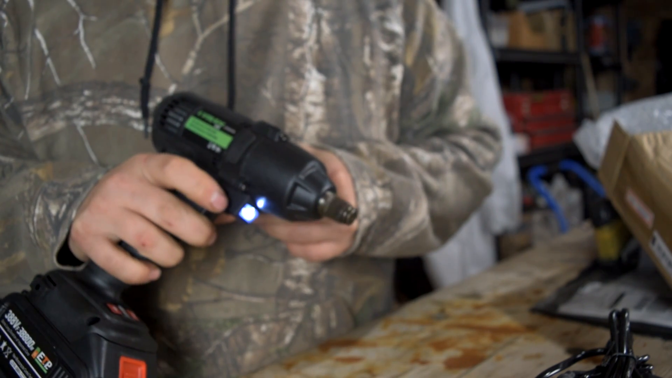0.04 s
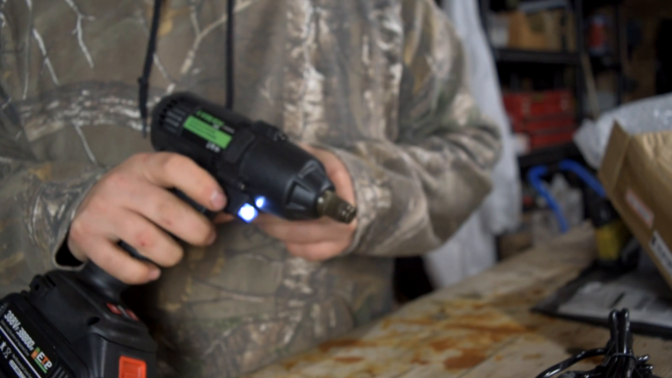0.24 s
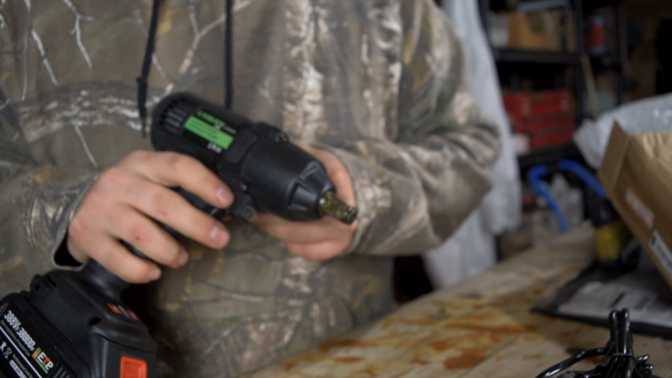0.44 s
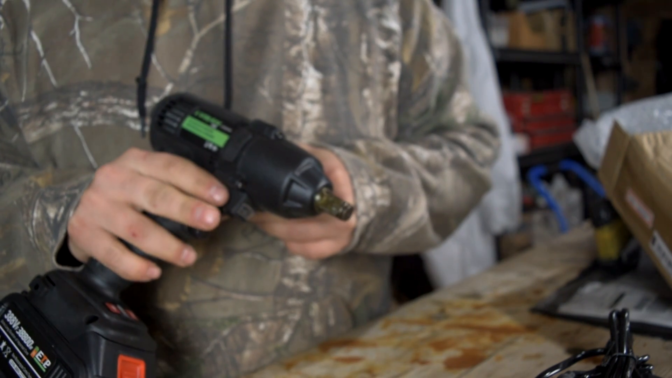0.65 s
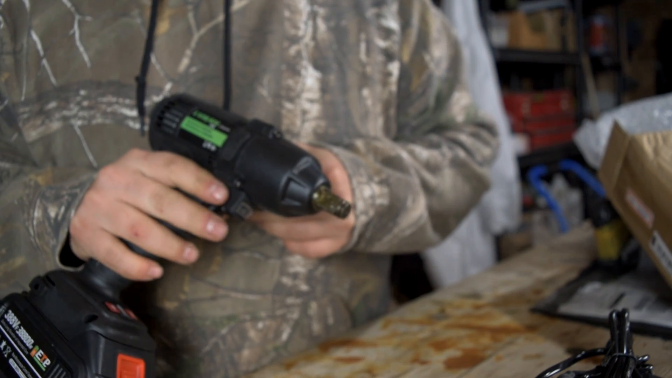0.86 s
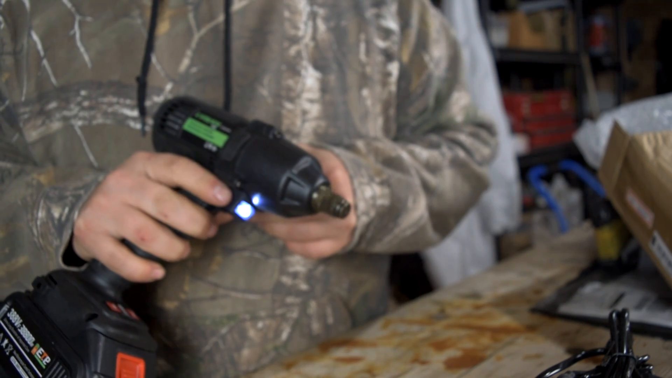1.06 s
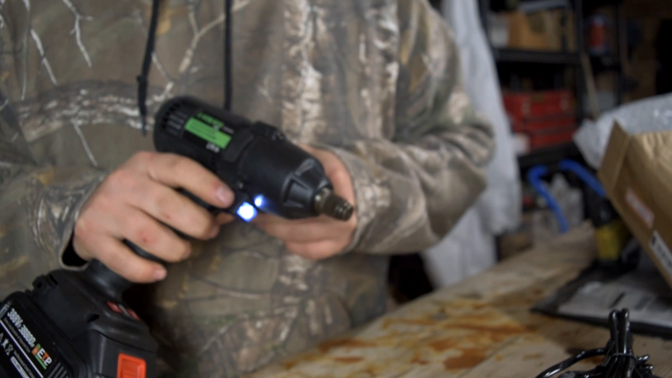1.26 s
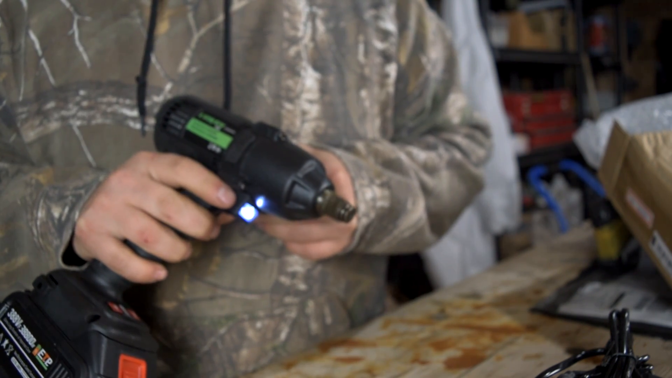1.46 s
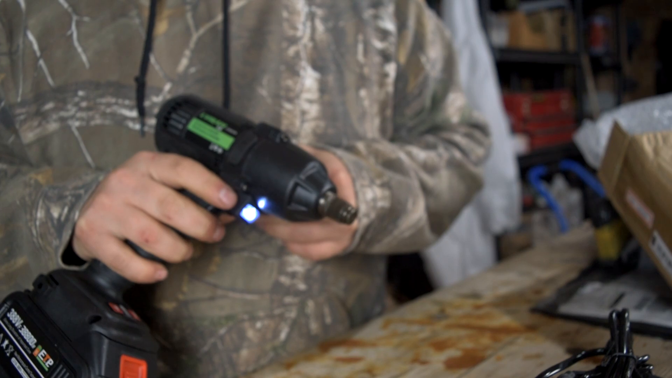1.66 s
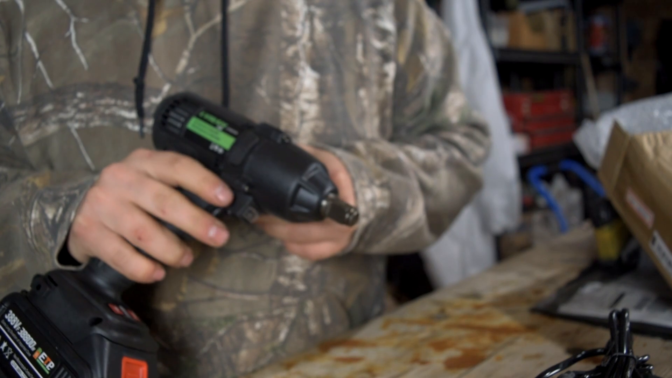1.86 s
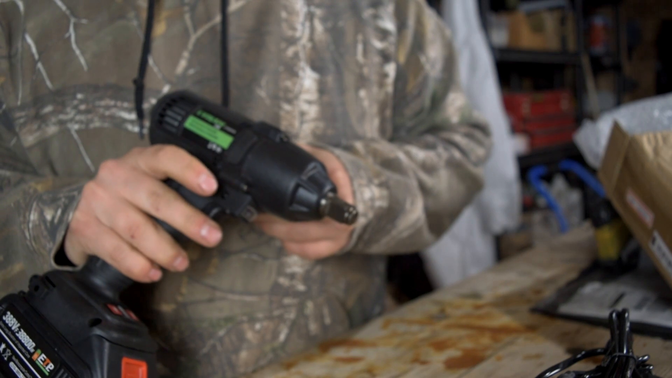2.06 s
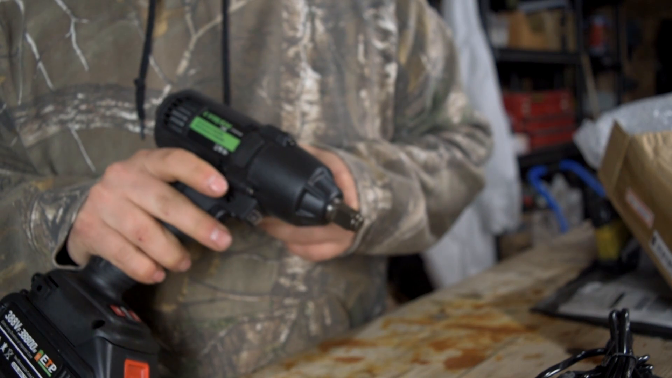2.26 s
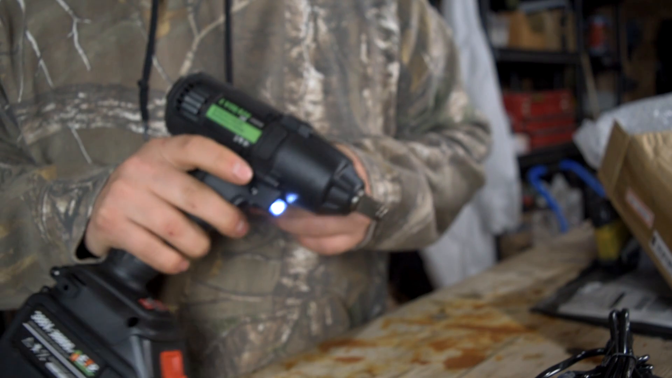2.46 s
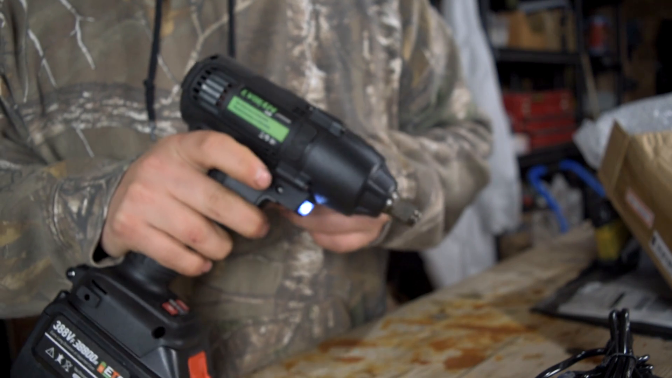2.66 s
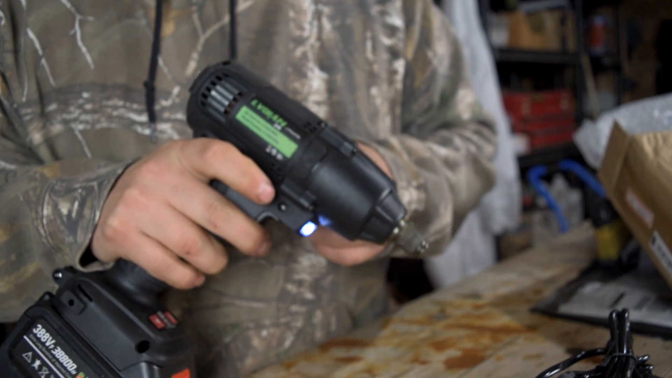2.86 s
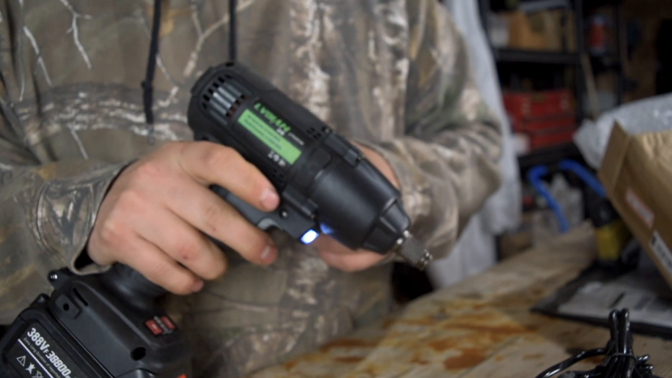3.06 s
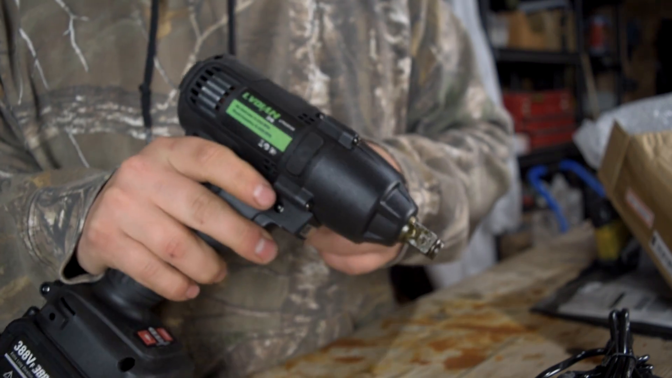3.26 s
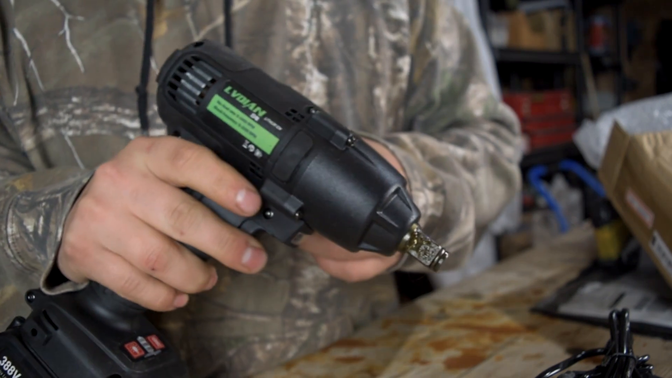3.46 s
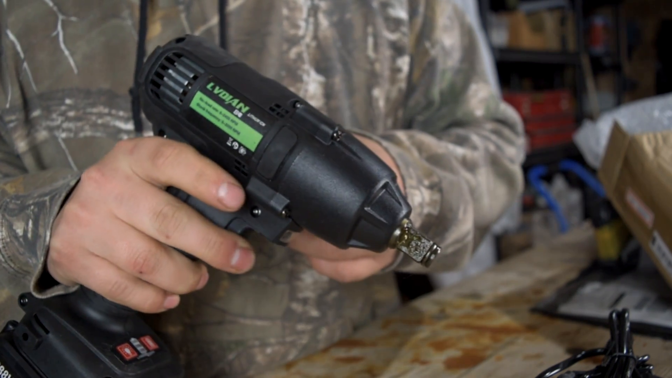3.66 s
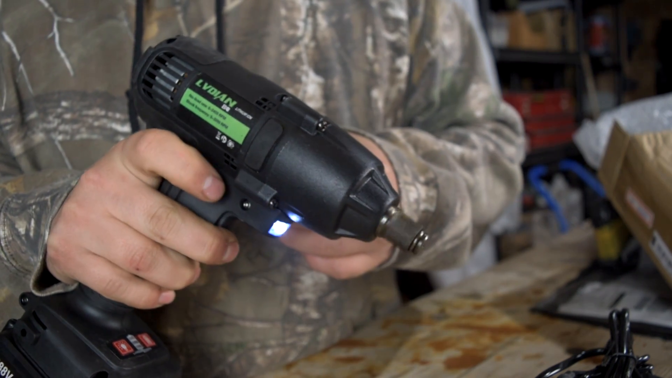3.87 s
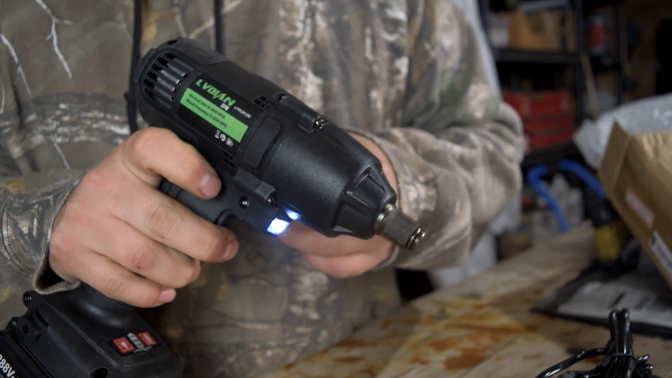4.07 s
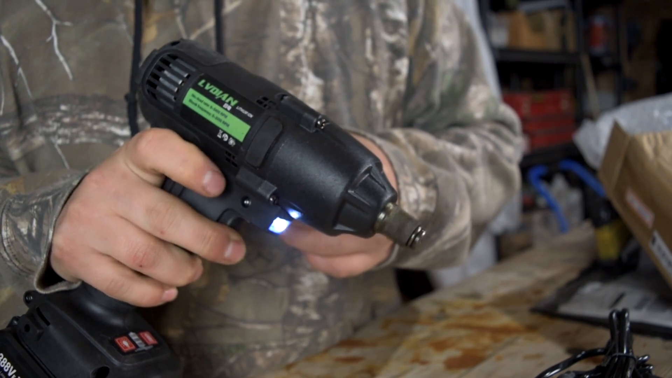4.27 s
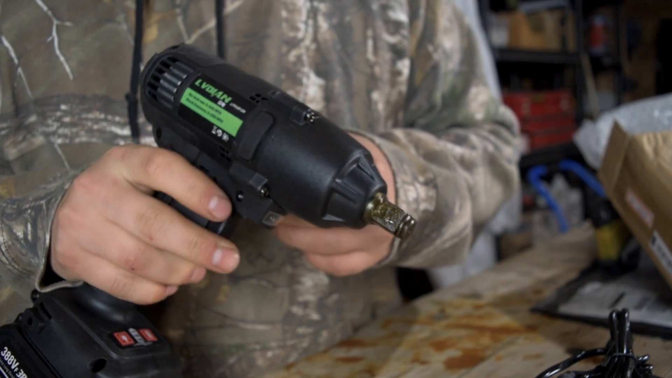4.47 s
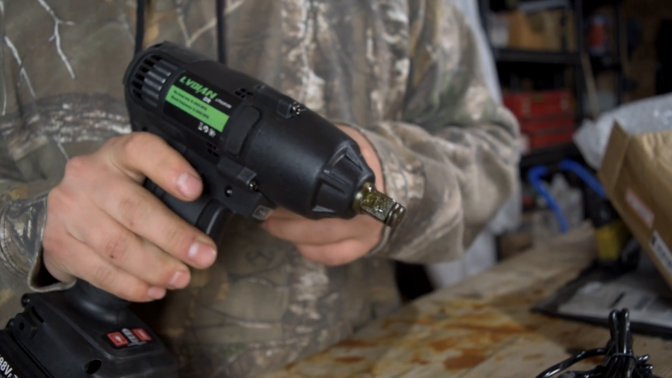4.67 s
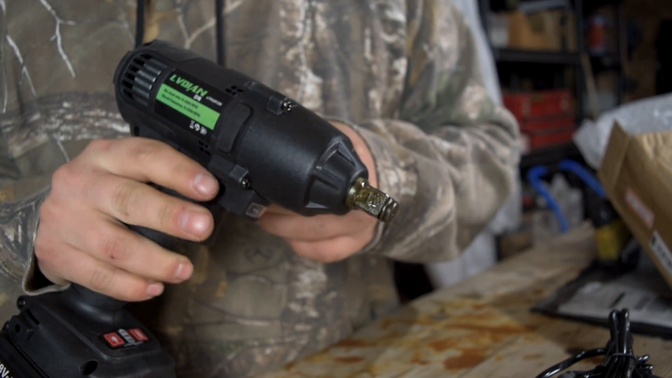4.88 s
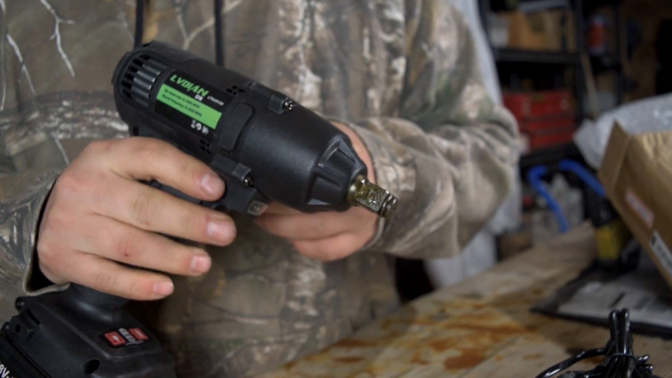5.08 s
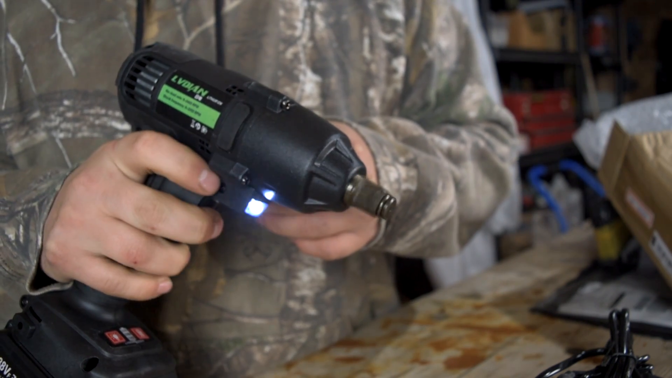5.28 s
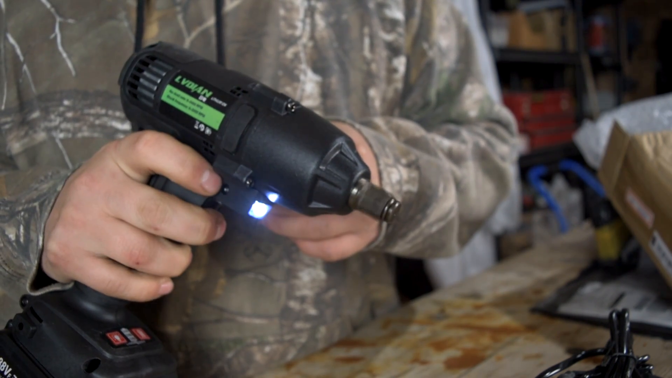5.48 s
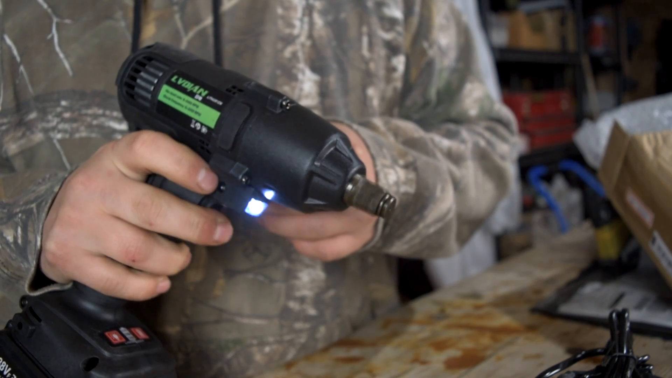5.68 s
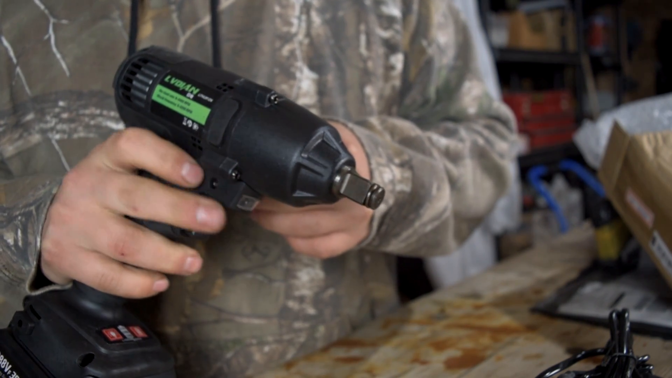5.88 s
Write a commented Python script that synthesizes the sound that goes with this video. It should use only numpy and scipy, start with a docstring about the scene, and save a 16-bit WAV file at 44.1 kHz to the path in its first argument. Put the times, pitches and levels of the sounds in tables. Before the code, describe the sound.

Close up, a handheld power driver revs freely again and again, gears whirring harshly, stopping quickly between loud plastic clicks and low handling bumps.

```python
"""Whining, rattling gears are heard first: a cordless impact driver, already running, coasts and is braked.
Four more pulls without load follow, close by in a small workshop: gear and motor tones over tooth noise.
The speed control sings as the motor starts; clicks of trigger, switch and drive ring the plastic shell.
Handling shakes the microphone mount, soft air and short reflections lie behind; a fast limiter ducks
after overloads."""
import sys
import numpy as np
from scipy import signal
from scipy.fft import irfft
from scipy.io import wavfile
from scipy.ndimage import uniform_filter1d

SR = 44100
rng = np.random.default_rng(int(sys.argv[2]) if len(sys.argv) > 2 else 0)


def to_wav(sig):
    """Store sig (one row per channel, or 1-D mono) as 16-bit WAV at the path in sys.argv[1].

    Samples outside -1..1 are clipped; the rate is SR.
    """
    pcm = np.clip(np.atleast_2d(sig), -1, 1) * 32767
    pcm = np.round(pcm).astype(np.int16)
    wavfile.write(sys.argv[1], SR, pcm.T)  # frames by channels


N = 261513
TIME = np.arange(N) / SR  # s
RUNNING_HZ = 1400  # reference gear mesh rate


def from_db(db):
    """Decibels to gain."""
    return 10 ** (np.asarray(db) / 20)


def rms_one(x):
    """Scale to unit power."""
    return x / np.sqrt(np.mean(x ** 2) + 1e-20)


def gain_curve_db(rows):
    """Interpolate rows of (s, dB) to every sample."""
    s, db = np.transpose(rows)
    return np.interp(TIME, s, db)


def filtered(x, order, hz, kind="low"):
    """Butterworth filter."""
    return signal.sosfilt(signal.butter(order, hz, kind, fs=SR, output="sos"), x)


def coloured(x, spectrum):
    """Give a signal a smooth spectrum, rolled off below its first frequency; rms 1."""
    hz, db = np.transpose(spectrum)
    bins_hz = np.maximum(np.fft.rfftfreq(2 * N, 1 / SR), 1)
    gain = from_db(np.interp(np.log(bins_hz), np.log(hz), db))
    gain = gain * np.minimum(bins_hz / hz[0], 1) ** 2
    pulse = np.roll(irfft(gain), 1024)[:2048] * np.hanning(2048)
    return rms_one(signal.fftconvolve(x, pulse, "same"))


def drift(hz):
    """Smooth random curve of spread 1 that changes about hz times a second."""
    step = 20  # samples between random draws
    r = np.exp(-2 * np.pi * hz * step / SR)
    draws = rng.standard_normal(N // step + 2002)
    slow = signal.lfilter([1], [1, -2 * r, r * r], draws)[2000:]  # settled part only
    return np.interp(np.arange(N) / step, np.arange(len(slow)), rms_one(slow))


def angle(hz):
    """Angle in radians turned at a given rate."""
    return 2 * np.pi * np.cumsum(hz) / SR


def ring(x, hz, t60_s):
    """Two-pole resonator: a unit click sets a decaying sine of initial height 1 ringing."""
    r, w = from_db(-60 / (t60_s * SR)), 2 * np.pi * hz / SR
    return signal.lfilter([0, np.sin(w)], [1, -2 * r * np.cos(w), r * r], x + 1e-18)


def tones(turn, table, flutter_db, slip_rad, flutter_hz):
    """Multiples of a turning part, each drifting in level and phase."""
    total = 0
    for multiple, db in table:
        level = from_db(db + flutter_db * drift(flutter_hz))
        phase = slip_rad * drift(flutter_hz) + 2 * np.pi * rng.random()
        total = total + level * np.sin(round(multiple) * turn + phase)
    return np.sqrt(2) * total


def each_turn(turn, count):
    """Small flaws of a turning part give the same uneven force on every turn."""
    force = irfft(np.r_[0, np.exp(2j * np.pi * rng.random(count))], 4096)
    one_turn = np.linspace(0, 2 * np.pi, len(force), endpoint=False)
    return rms_one(np.interp(turn, one_turn, force, period=2 * np.pi))


# Trigger pulls. Each row: start in s, full power in s, release in s, brake in s, surge time constant in s,
# top gear mesh rate in Hz, last creep to the top in Hz, rattle in dB, mesh tone in dB,
# take-up clunk in dB, hum in dB (rattle, tone and hum before speed and torque act).
PULLS = [(-.2, -.151, .356, .412, .034, 1449, 90, -15.5, -15.5, -40, -17.5),
         (1.029, 1.052, 1.734, 1.818, .024, 1456, 125, -16.8, -19, -18, -16),
         (2.47, 2.573, 2.897, 3.16, .03, 1444, 100, -16, -15.3, -32, -18),
         (3.715, 3.868, 4.276, 4.324, .034, 1501, 195, -16.2, -13.7, -21, -12),
         (5.212, 5.244, 5.704, 5.76, .031, 1509, 72, -16, -18, -20, -13.5)]
HANDOVER_HZ = 650  # mesh rate at the end of the soft start
CREEP_S, COAST_S = .3, .215  # time constants
BRAKE_S, FRICTION_HZ_PER_S = .035, 260
RATTLE_POWER, WHINE_POWER, HUM_POWER = 1.0, 4.5, 3  # exponents of speed
STRAIN_DB, COAST_TONE_DB = 15, -30
RUMBLE_DB, SLACK_DB, SLACK_HZ = -30.5, 5.5, 500  # slack gears rumble more, fully so SLACK_HZ below running
CLUNK_S, CLUNK_RUMBLE_DB, KICK_DB = 0.0057, -2, -24  # CLUNK_S: half-width at 1/e


def motor():
    """Mesh rate in Hz and gains of rattle, rumble, mesh tone and hum, set by speed, torque and brake."""
    mesh_hz = rattle = rumble = whine = drone = 0
    for (start, full, release, brake, surge_s, top_hz, creep_hz,
         rattle_db, whine_db, clunk_db, hum_db) in PULLS:
        # soft start, surge, creep to the top
        ramp = np.clip((TIME - start) / (full - start), 0, 1)
        driven_s = np.clip(TIME, full, release) - full
        surge_hz = (top_hz - creep_hz - HANDOVER_HZ) * np.exp(-driven_s / surge_s)
        powered_hz = ramp * (top_hz - surge_hz - creep_hz * np.exp(-driven_s / CREEP_S))
        # coast, then brake
        coasted_s = (TIME - release).clip(0)
        unbraked = np.clip(1 - (TIME - brake) / BRAKE_S, 0, 1)
        hz = (powered_hz * np.exp(-coasted_s / COAST_S) - FRICTION_HZ_PER_S * coasted_s).clip(0) * unbraked
        hz = uniform_filter1d(hz, size=500).clip(0)  # inertia rounds the corners

        speed = hz / RUNNING_HZ
        rolling = unbraked * np.minimum(hz / 420, 1) ** 2
        load_db = STRAIN_DB * (1 - powered_hz / top_hz) * ramp  # torque strains the teeth
        slack = np.clip((RUNNING_HZ - hz) / SLACK_HZ, 0, 1)
        # play taken up at full power; kick as the brake bites
        clunk = from_db(clunk_db) * np.exp(-((TIME - full) / CLUNK_S) ** 2)
        kick = from_db(KICK_DB) * np.exp(-((TIME - brake) / CLUNK_S) ** 2) * np.sqrt(speed)
        # coasting gears sing on their slack flanks
        coast_tone = from_db(COAST_TONE_DB) * slack * rolling * np.sqrt(speed) * (TIME > release)

        mesh_hz = mesh_hz + hz
        rattle = rattle + from_db(rattle_db + load_db) * unbraked * speed ** RATTLE_POWER
        rattle = rattle + clunk + .5 * kick
        rumble = rumble + from_db(RUMBLE_DB + SLACK_DB * slack + .5 * load_db) * rolling
        rumble = rumble + from_db(CLUNK_RUMBLE_DB) * clunk + kick
        whine = whine + from_db(whine_db) * speed ** WHINE_POWER + coast_tone
        drone = drone + from_db(hum_db) * speed ** HUM_POWER
    return mesh_hz, rattle, rumble, whine, drone


# Gear tones at and beside the tooth rate. Each row: multiple of the gear's turning rate, level in dB.
MESH_TONES = [(16, -9.5), (17, -4.5)]
# Gear tones around its overtones. Each row: multiple of the gear's turning rate, relative level in dB.
MESH_OVERTONES = [(30, -14), (32, -10), (33, 0), (34, -2.5), (49, -8), (50, 2), (51, -9)]
# Radiation of the housing, also played by motor_tones and tooth_rattle. Each row: frequency in Hz,
# relative density in dB per Hz.
HOUSING = [(500, -49.5), (1100, -2), (1700, -1), (2300, 1), (2750, 3.5), (3300, 2), (4150, -3.5),
           (4800, -13), (5900, -19.5), (7300, -6), (8600, -13.5), (11200, -21), (12500, -27.5),
           (16000, -35)]
# How freely the gear case sings as the hand shifts on it. Each row: time in s, gain in dB before a 3.5 dB cut.
GRIP = [(0, 2), (1.9, 1.5), (2.5, -.5), (4.0, -1.5), (5.8, 0)]


def gear_tones(gear, rotor, chatter, turning, seated, rattle, rumble, whine):
    """Tooth engagement whines at the mesh rate and its overtones, unsteady as the teeth seat differently."""
    low_level = chatter * (whine + from_db(-9.5) * rumble * turning * (1 - seated))
    low_whine = low_level * tones(gear, MESH_TONES, flutter_db=3.5, slip_rad=0.61, flutter_hz=30)
    low_whine = low_whine * (1 + 0.13 * np.cos(rotor))
    wobble = 1 + .45 * np.cos(rotor)  # unbalance presses the teeth together once a turn
    tooth_force = tones(gear, MESH_OVERTONES, flutter_db=2.2, slip_rad=.42, flutter_hz=35)
    tooth_force = tooth_force * wobble * chatter
    grip = from_db(gain_curve_db(GRIP) - 3.5)
    return low_whine + grip * rattle * turning * coloured(tooth_force, HOUSING)


# Motor tones, strongest near multiples of the commutator rate. Each row: multiple of the rotor rate,
# relative level in dB.
ROTOR_TONES = [(15, -8), (20, -7), (29, -5), (30, 0), (31, -6), (34, -5), (35, 0), (38, -7), (39, -6),
               (40, -3), (49, -2), (50, 2.5)]
# Motor hum carried by the air. Each row: multiple of the rotor rate, level in dB before the hum gain.
HUM = [(1, -24), (3, -31)]


def motor_tones(rotor, seated, rattle, drone):
    """Brush forces radiate through the housing; low rotor multiples hum through the air."""
    brush_force = tones(rotor, ROTOR_TONES, flutter_db=2.5, slip_rad=.15, flutter_hz=15)
    brushes = from_db(-11) * rattle * seated * coloured(brush_force, HOUSING)
    return brushes + drone * tones(rotor, HUM, flutter_db=2.5, slip_rad=.2, flutter_hz=6.2)


# Rumble of the housing. Each row: frequency in Hz, relative density in dB per Hz.
HOUSING_LOW = [(60, -58), (150, -12), (320, -8), (600, -3.5), (850, 2), (1150, -22.5), (1800, -28),
               (4000, -80)]
# Bright hiss of the running gears. Each row: time in s, level in dB against the rattle gain.
HISS_LEVEL = [(0, -25), (1.9, -23), (2.5, -13.5), (4.2, -18), (5.8, -11)]
TICK_DB, TICK_ABOVE_HZ = -13, 5800  # loose teeth tick brightly at low speed


def tooth_rattle(mesh, gear, rotor, turning, seated, rattle, rumble):
    """Knocking teeth make noise that throbs with gear, rotor and mesh; flaws buzz once a turn."""
    throb_db = 1.5 * np.cos(gear) + (3.2 - 2 * seated) * np.cos(rotor) + 1.2 * np.cos(mesh)
    unsteady_db = (.8 + 1.5 * (1 - seated)) * drift(45)
    knocks = rng.standard_normal(N) * from_db(throb_db + unsteady_db)
    flaws = turning * (each_turn(rotor, count=68) + 0.83 * each_turn(gear, count=150))
    buzz = from_db(-9.5) * rattle * coloured(flaws, HOUSING)
    clatter = rattle * from_db(-1.4 - 2.0 * seated) * coloured(knocks, HOUSING)
    growl = rumble * from_db(-0.5) * coloured(knocks + 0.2 * flaws, HOUSING_LOW)
    throbbing_noise = coloured(rng.standard_normal(N) * from_db(throb_db), HOUSING)
    bright = rms_one(filtered(throbbing_noise, 4, TICK_ABOVE_HZ, "high"))
    bright_gain = from_db(TICK_DB) * (1 - seated) + from_db(gain_curve_db(HISS_LEVEL))
    return buzz + clatter + growl + rattle * bright_gain * bright


TEETH, ROTOR_PER_MESH = 17, .1597  # teeth on the gear; rotor turns per tooth


def drive(mesh_hz, rattle, rumble, whine, drone):
    """Gear and motor tones over tooth rattle, all locked to one turning angle."""
    mesh = angle(mesh_hz * (1 + .0012 * drift(15)))
    gear, rotor = mesh / TEETH, mesh * ROTOR_PER_MESH
    turning = np.clip(mesh_hz / 450, 0, 1)
    seated = np.clip(mesh_hz / 1380, 0, 1) ** 2  # at low speed the teeth knock about in their play
    change_hz_per_s = uniform_filter1d(np.abs(np.gradient(mesh_hz)) * SR, size=1000)
    lash = np.clip(change_hz_per_s / 3500, 0, 1)
    chatter = from_db(lash * (3 * drift(110) - 1))  # hard speed changes bounce teeth between their flanks
    return (gear_tones(gear, rotor, chatter, turning, seated, rattle, rumble, whine)
            + motor_tones(rotor, seated, rattle, drone)
            + tooth_rattle(mesh, gear, rotor, turning, seated, rattle, rumble))


# Singing of the windings. Each row: start in s, end in s, level at the start in dB.
SINGING = [(1.005, 1.05, -42), (2.408, 2.56, -35), (3.716, 3.87, -37), (5.2, 5.24, -39)]
SINGING_HZ, SINGING_FADE_DB_PER_S, SINGING_RISE_S = 3540, 5, .004


def speed_control(mesh_hz):
    """Chopped current makes the windings sing as the motor starts."""
    level = 0
    for start, end, db in SINGING:
        fade_db = SINGING_FADE_DB_PER_S * (TIME - start).clip(0)
        rise = np.clip((TIME - start) / SINGING_RISE_S, 0, 1)
        level = level + from_db(db - fade_db) * rise * (TIME < end)
    roughness = .004 + mesh_hz / 22000  # the turning rotor roughens the note
    chop = angle(SINGING_HZ * (1 + roughness * drift(60)))
    harmonics = [(1, 0), (2, -18), (3, -29), (4, -32)]  # (multiple, dB)
    return level * tones(chop, harmonics, flutter_db=1.5, slip_rad=.4, flutter_hz=200)


# Clicks of trigger, switch and drive, and a handling scrape at 3.29 s. Each row: time in s, overall gain in dB,
# treble in dB, body ring in dB.
CLICKS = [(.490, -23, -8, 8.5), (.606, -8.5, 3, 5), (.690, -10, -1.5, 11), (.986, -19.5, -18, 2),
          (1.0579, 13, 5, -19), (1.992, -25, -9, 2), (2.013, -8, 6.5, 2.5), (2.121, -1, 2.5, 5.5),
          (2.548, 14.5, -25, 0), (3.225, -24, -3, 1), (3.262, -26.5, -1, 6), (3.2909, -26.5, -1, 19),
          (3.723, -18.5, -3, 0), (4.322, 0.5, -3, 4), (4.566, -20, -21, -6), (4.820, -15, -8, -11),
          (4.838, -26, -14, -17), (4.9122, -1, 3, 4.5), (4.9592, 2, 8.5, 3.5), (5.111, -25, -6, -14),
          (5.193, -11.5, -1, 0), (5.25, 14.5, 2.5, -31)]
# Modes of the plastic shell. Each row: nominal frequency in Hz, peak in dB before tilt and click gain, t60 in s.
SHELL = [(286, -32.5, 0.0083), (484, -22, 0.016), (758, -19.5, 0.035), (1030, -20, 0.065),
         (1404, -19, 0.022), (2380, -12.5, 0.015), (3000, -8.5, 0.0034), (3590, -10.5, 0.021),
         (5060, -17.5, 0.013), (7160, -11, 0.0015), (9940, -20, 0.0012)]


def clicks():
    """Snaps with milliseconds of chatter ring the shell; mode frequencies vary a little from click to click."""
    out, age = np.zeros(N), TIME[:SR // 5]
    for s, db, treble_db, body_db in CLICKS:
        chatter = rng.standard_normal((len(SHELL) + 1, len(age)))
        chatter *= np.exp(-age / 0.0024) * np.minimum(age / 0.00022, 1)
        chatter /= np.linalg.norm(chatter, axis=1, keepdims=True)
        sound = from_db(treble_db) * filtered(chatter[0], 2, 10000)  # soft plastic dulls the snap
        for contact, (hz, mode_db, t60_s) in zip(chatter[1:], SHELL):
            tilt_db = np.interp(np.log(hz), np.log([1200, 2300, 4000, 7000]), [body_db, 0, 0, treble_db])
            mode = ring(contact, hz * rng.uniform(.93, 1.07), t60_s)
            sound = sound + from_db(mode_db + tilt_db) * mode / np.abs(mode).max()
        at = round(s * SR)
        out[at:at + len(age)] += from_db(db) * sound[:N - at]
    return out


# Dull bumps against the microphone. Each row: time in s, blow in dB.
BUMPS = [(2.495, -15.5), (2.531, -20), (2.746, -16.5), (2.826, -17), (2.924, -18), (2.979, -23),
         (3.199, -8.5), (3.214, -20), (3.261, -7), (3.29, -10), (3.387, -26)]
# Modes of the microphone's holder. Each row: frequency in Hz, gain in dB, t60 in s.
HOLDER = [(106.5, 4.5, 0.039), (165, -12.5, 0.088), (246, -6.5, 0.022)]


def bumps():
    """Soft blows ring the microphone's holder."""
    s, db = np.transpose(BUMPS)
    blows = np.zeros(N)
    blows[np.round(s * SR).astype(int)] = from_db(db)
    knock = sum(from_db(mode_db) * ring(blows, hz, t60_s) for hz, mode_db, t60_s in HOLDER)
    return filtered(knock, 2, 600)


# Slow sway of the microphone. Each row: time in s, level in dB before a 1.5 dB boost.
SWAY = [(0.0, -34), (0.4, -46), (0.45, -21), (0.68, -18.5), (1.7, -39.5), (1.86, -21), (2.49, -21),
        (2.89, -27), (2.96, -16), (3.17, -24.5), (3.32, -11.5), (3.73, -32.5), (3.95, -25.5), (4.14, -54),
        (4.36, -22.5), (5.78, -31.5), (5.83, -17), (5.93, -24)]
# Jolts of the mount. Each row: time in s, bounce in dB before a 3.5 dB boost, dull rubbing in dB.
JOLTS = [(.73, -40, -47), (1.052, -41, -33), (1.9, -37, -42), (2.18, -21, -39), (2.53, -18, -23.5),
         (2.82, -19, -32), (2.95, -13.5, -30), (3.239, -8, -17.5), (3.361, -5, -28), (3.51, -21, -37),
         (3.79, -29.5, -36.5), (4.36, -37, -34), (4.99, -32, -38), (5.27, -30, -30), (5.82, -30.5, -33.5)]
# Colour of the rubbing. Each row: frequency in Hz, relative density in dB per Hz.
RUBBING = [(50, -30), (80, 2.5), (115, 0.5), (200, -10.5), (400, -14.5), (800, -25.5), (2000, -35.5),
           (6000, -60.5)]
MOUNT_HZ, SWAY_HZ = 55.5, 18  # centres of drifting rates
JOLT_S = 0.051  # half-width at 1/e
# tremble at rest, and what the running tool adds; bounce before the same 3.5 dB boost
BOUNCE_REST_DB, BOUNCE_RUN_DB, RUB_REST_DB, RUB_RUN_DB = -41, -43, -47, -47.5


def handling(running):
    """The microphone sways slowly; jolts and the running tool bounce its mount and bring dull rubbing."""
    bounce = from_db(BOUNCE_REST_DB) + from_db(BOUNCE_RUN_DB) * running
    rub = from_db(RUB_REST_DB) + from_db(RUB_RUN_DB) * running
    for s, bounce_db, rub_db in JOLTS:
        swell = np.exp(-((TIME - s) / JOLT_S) ** 2)
        bounce = bounce + from_db(bounce_db) * swell
        rub = rub + from_db(rub_db) * swell
    swaying = from_db(gain_curve_db(SWAY) + 1.5) * np.sin(angle(SWAY_HZ * (1 + 0.332 * drift(20))))
    bouncing = bounce * from_db(3.5) * np.sin(angle(MOUNT_HZ * (1 + 0.0703 * drift(7.4))))
    rubbing = rub * coloured(rng.standard_normal(N), RUBBING)
    return swaying + bouncing + rubbing + bumps()


ROOM_T60_S, ROOM_DB = 0.25, -15


def workshop(x):
    """Dense reflections from shelves and walls, dull and short: decaying noise as impulse response."""
    age = TIME[:SR // 2]
    tail = rng.standard_normal(len(age)) * from_db(-60 * age / ROOM_T60_S) * (age > .005)
    tail = filtered(tail / np.linalg.norm(tail), 2, 7500)
    return from_db(ROOM_DB) * signal.fftconvolve(x, tail)[:N]


# Colour of the workshop air. Each row: frequency in Hz, relative density in dB per Hz.
AIR = [(120, -28), (200, -5), (423, -14.5), (456, -10), (557, -8), (669, -4.5), (865, -9.5), (1060, -0.5),
       (1270, -9), (1500, -3), (2410, -22.5), (14700, -35.5), (15900, -39.5)]
# Its level. Each row: time in s, rms in dB.
AIR_LEVEL = [(0, -57), (.9, -46), (1.95, -48), (2.3, -43), (5.15, -41.5), (5.93, -46)]


def air():
    """Soft rush of the workshop: coloured noise of slowly changing level."""
    return from_db(gain_curve_db(AIR_LEVEL)) * coloured(rng.standard_normal(N), AIR)


def scene():
    """The tool in its room, with air and handling."""
    mesh_hz, *gains = motor()
    tool = drive(mesh_hz, *gains) + speed_control(mesh_hz) + clicks()
    return (tool + workshop(tool) + air() + handling(mesh_hz / RUNNING_HZ))[None]


CUTOFF_HZ = 16000


def record(dry, threshold_db=0.0, release_db_per_s=260, attack_s=0.0013):
    """A fast limiter ducks after overloads, what slips past it clips, and the top is cut."""
    over_db = np.maximum(20 * np.log10(np.abs(dry) + 1e-9) - threshold_db, 0)
    released_db = release_db_per_s * TIME
    held_db = np.maximum.accumulate(over_db + released_db, axis=-1) - released_db
    r = np.exp(-1 / (attack_s * SR))
    duck_db = signal.lfilter([1 - r], [1, -r], held_db)
    limited = np.clip(dry * from_db(-duck_db), -1, 1)
    return signal.sosfilt(signal.ellip(10, .1, 70, CUTOFF_HZ, fs=SR, output="sos"), limited)


dry = scene()
out = record(dry)
to_wav(out)
```